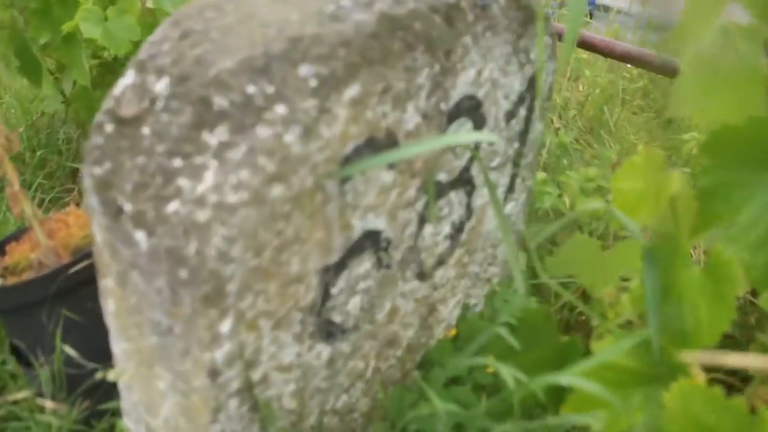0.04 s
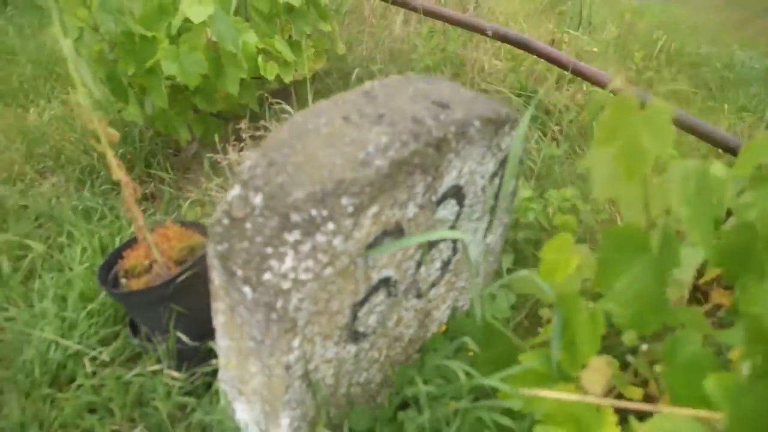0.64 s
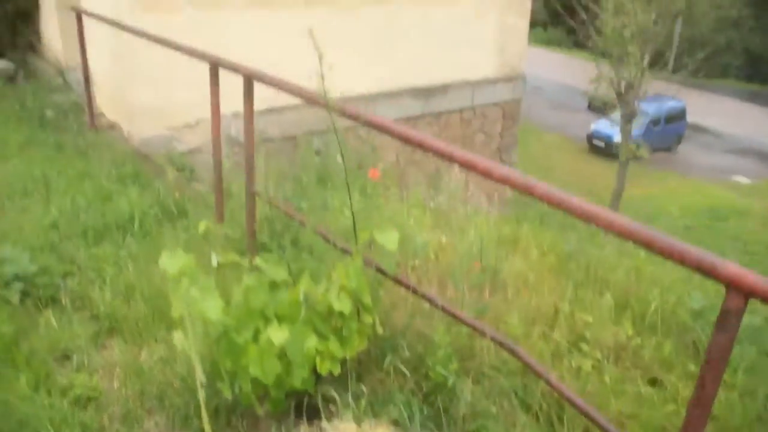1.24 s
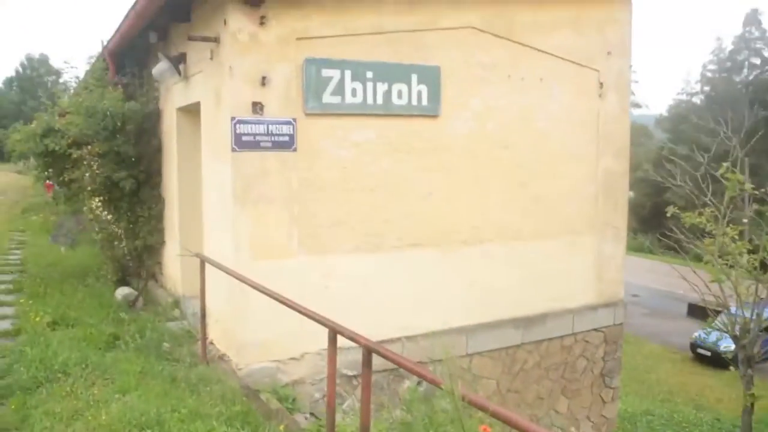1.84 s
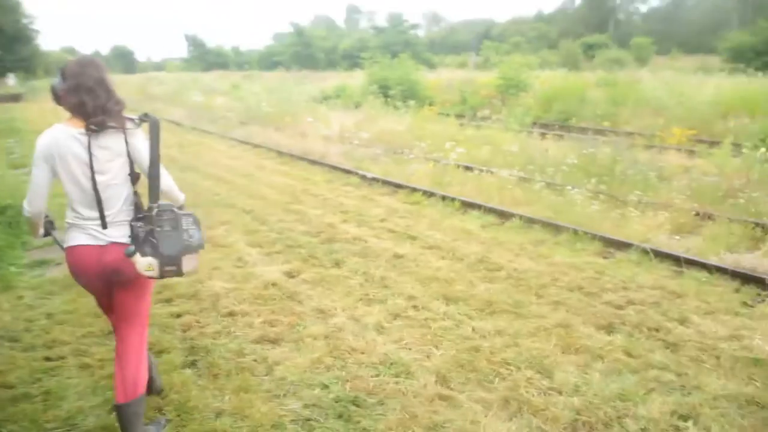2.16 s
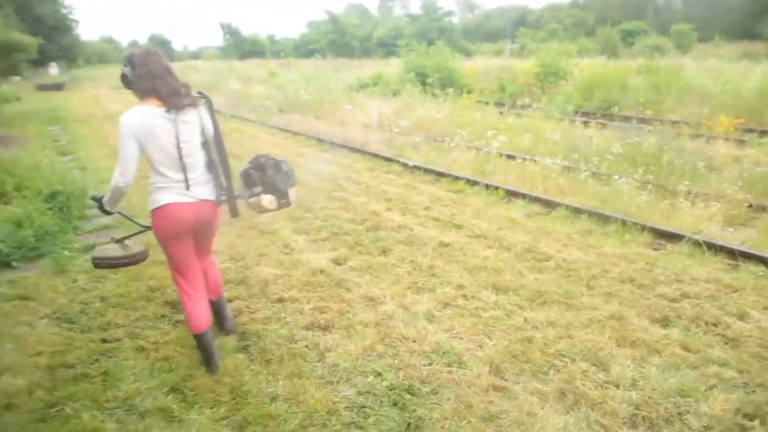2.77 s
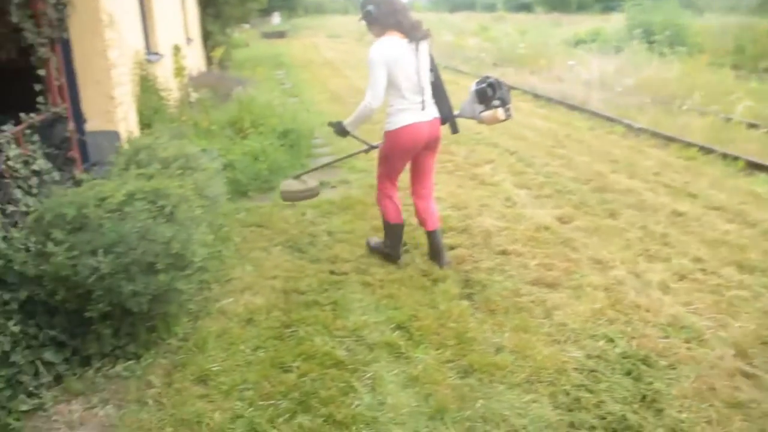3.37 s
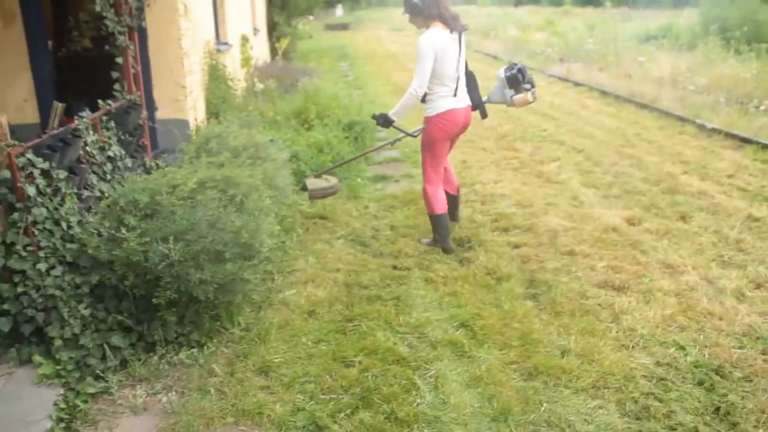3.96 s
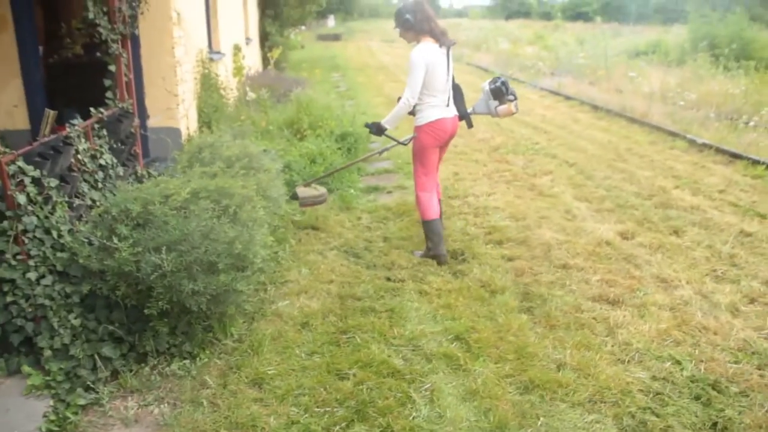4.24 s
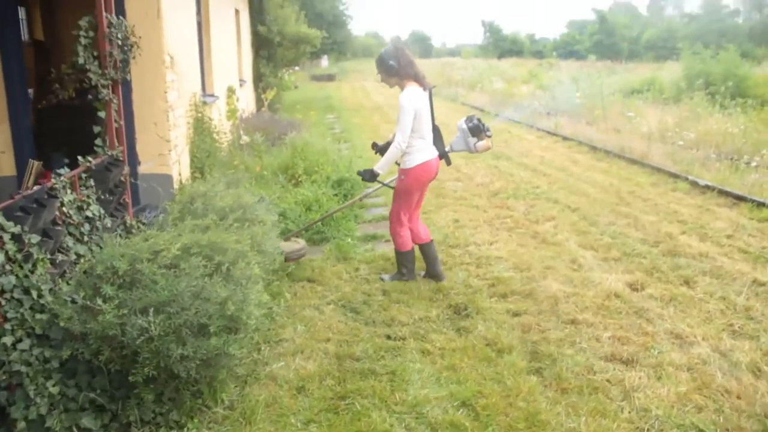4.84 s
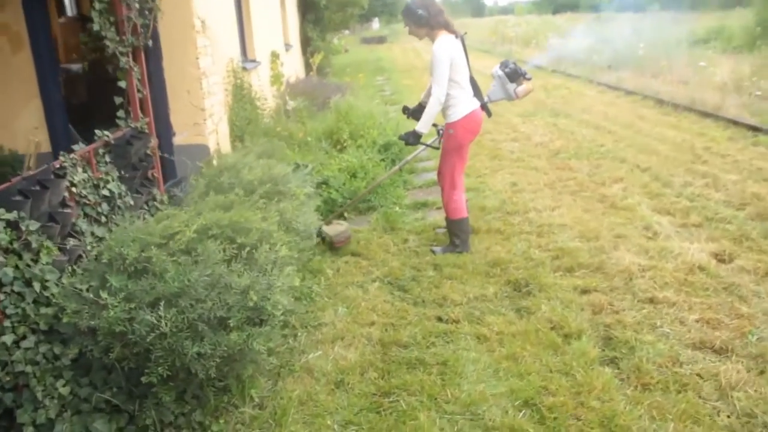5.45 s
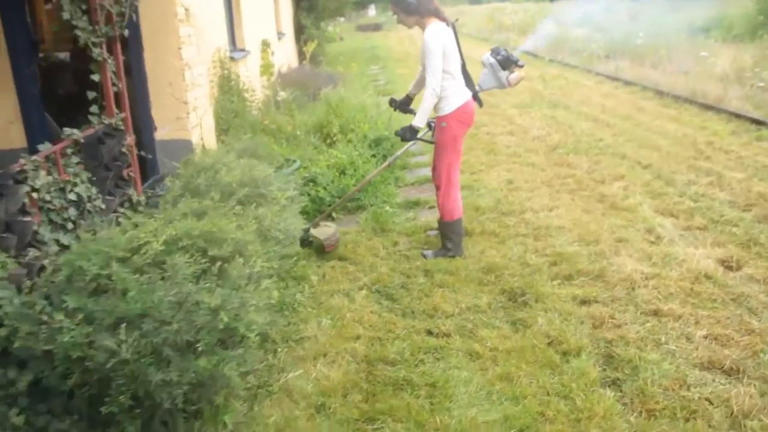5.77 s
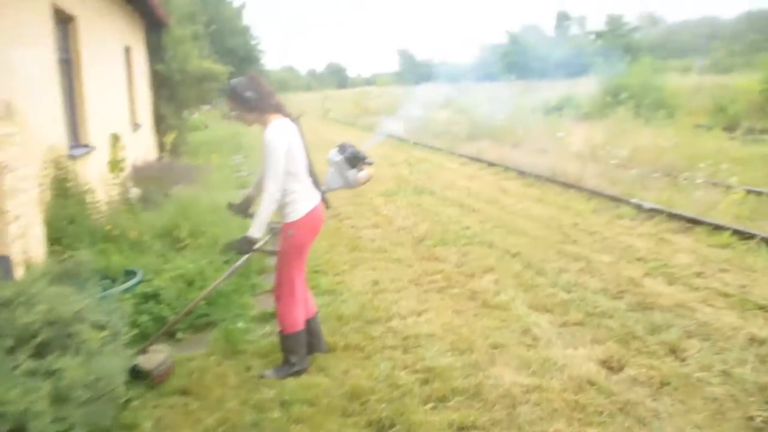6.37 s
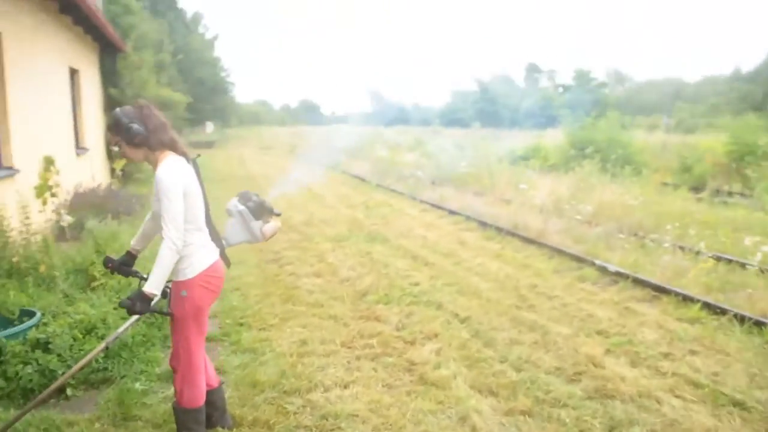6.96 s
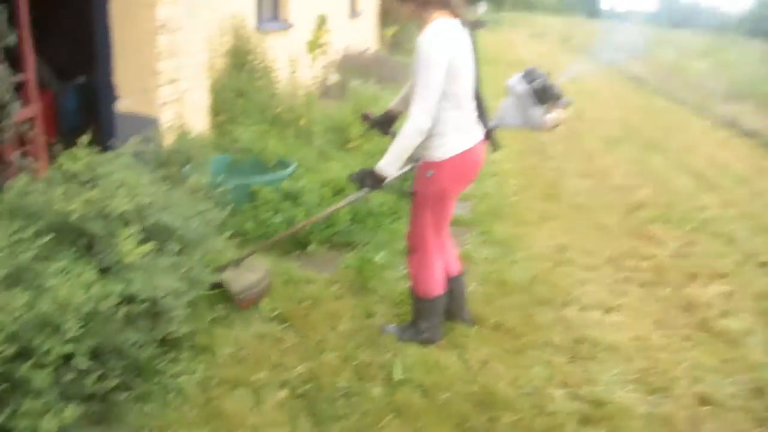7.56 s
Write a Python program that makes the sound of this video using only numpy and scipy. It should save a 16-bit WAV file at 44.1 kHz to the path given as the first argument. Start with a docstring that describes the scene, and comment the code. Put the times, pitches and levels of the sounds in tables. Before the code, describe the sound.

Faint two-stroke idling jumps to a near, uneven putter, then the trimmer's throttle opens and its line swishes through grass, snapping stalks.

```python
"""A soft, distant clatter comes first: a two-stroke string trimmer idling far down a garden.
Suddenly it is two metres from the microphone, knocking unevenly and rattling its loose clutch.
The throttle opens: sharp exhaust pulses speed up and echo from the ground and a house wall,
while the whirling line swishes through the grass and snaps stalks."""
import sys
import numpy as np
from scipy import signal
from scipy.fft import rfft, irfft, next_fast_len
from scipy.io import wavfile
from scipy.ndimage import uniform_filter1d, map_coordinates

SR = 44100
rng = np.random.default_rng(int(sys.argv[2]) if len(sys.argv) > 2 else 0)


def generate_wav(signal):
    """Clip the signal to [-1, 1] and save it as 16-bit WAV at the path in sys.argv[1]."""
    frames = np.transpose(np.atleast_2d(signal))
    scaled = np.clip(frames, -1, 1) * 32767
    pcm = np.round(scaled).astype(np.int16)
    wavfile.write(sys.argv[1], SR, pcm)


N = 339570
TIME = np.arange(N) / SR
CLOSE_S, THROTTLE_S = 2.1275, 4.62


def amp(db):
    """Decibels to gain."""
    return 10 ** (np.asarray(db) / 20)


def unit(x):
    """x at rms 1."""
    return x / np.sqrt(np.mean(x ** 2) + 1e-20)


def levelled(x):
    """x with its slow level held at rms 1."""
    return x / np.sqrt(np.abs(uniform_filter1d(x ** 2, size=6000)) + 1e-12)


def along(points, hz):
    """Rows of frequency and value, read on a log axis."""
    f, v = np.transpose(points)
    return np.interp(np.log(hz + 1), np.log(f + 1), v)


def curves(rows, at=TIME):
    """Each later column, interpolated along the first."""
    knots, *columns = np.transpose(rows)
    return [np.interp(at, knots, column) for column in columns]


def bell(x, centre, width):
    """A smooth hump of height 1."""
    return np.exp(-((x - centre) / width) ** 2)


def wobble(rate):
    """A smooth random curve, rate knots a second."""
    return map_coordinates(rng.standard_normal(int(N * rate / SR) + 4), [TIME * rate])


def noise():
    """White noise."""
    return rng.standard_normal(N)


def uneven(times, spread_db):
    """A random gain for each hit."""
    return amp(spread_db * rng.standard_normal(len(times)))


def pulses(times, sizes):
    """Impulses placed between samples."""
    at = np.asarray(times)[:, None] * SR
    taps = np.floor(at).astype(int) + np.arange(-7, 9)
    shape = np.sinc(taps - at) * np.cos(np.pi * (taps - at) / 16) ** 2
    weights = shape * np.asarray(sizes)[:, None]
    return np.bincount(np.clip(taps, 0, N).ravel(), weights.ravel(), N + 1)[:N]


def fading(times, sizes, t60):
    """An envelope that jumps at each time and dies away."""
    return signal.lfilter([1], [1, -amp(-60 / (t60 * SR))], pulses(times, sizes))


def grains(rate, spread_db):
    """Tiny impacts at random times, a few of them large."""
    chance, size = rng.random((2, N))
    return (chance < rate / SR) * amp(-spread_db * np.log(size + 0.024)) * noise()


def filtered(x, response):
    """x times a complex response of frequency."""
    size = 2 * next_fast_len(N // 2 + SR // 4)
    return irfft(rfft(x, size) * response(np.fft.rfftfreq(size, 1 / SR)), size)[:N]


def coloured(x, spectrum):
    """x through a causal filter with the given spectrum."""
    def response(hz):
        cepstrum = irfft(np.log(amp(along(spectrum, hz))))
        cepstrum[1:len(hz) - 1] *= 2
        cepstrum[len(hz):] = 0
        return np.exp(rfft(cepstrum))
    return filtered(x, response)


def rung(x, modes):
    """x through a set of resonances."""
    return filtered(x, lambda f: sum(amp(db) * 1j * f * width / (hz * hz - f * f + 1j * f * width)
                                     for hz, width, db in modes))


def gliding(x, hz, width_hz):
    """x through one resonance whose centre moves."""
    carrier = np.exp(2j * np.pi * np.cumsum(hz) / SR)
    pole = np.exp(-np.pi * width_hz / SR)
    return 2 * np.real(carrier * signal.lfilter([1 - pole], [1, -pole], x * carrier.conj()))


def shell(x, t60):
    """The many close modes of thin metal covers give a fixed, fine colour."""
    t = np.arange(SR // 8) / SR
    ring = rng.standard_normal(len(t)) * amp(-60 * t / t60)
    return signal.oaconvolve(x, ring / np.linalg.norm(ring))[:N]


# Crank with the throttle open: time_s, speed_hz
REVS = [(4.62, 41.9), (4.7, 44.7), (4.82, 58.1), (4.9, 67.7), (5.05, 75.2), (5.16, 75.6), (5.4, 79.4),
        (5.7, 81.6), (5.9, 81.5), (6.1, 83), (6.42, 83.3), (6.62, 85.2), (6.8, 82.5), (7.0, 85.3),
        (7.22, 88.9), (7.4, 90.9), (7.7, 89.3)]
def crank(far_hz=47.57, close_hz=42.53):
    """Crank speed, turns so far and when each ends; whole turns fit between the close knocks."""
    knock_s = np.transpose(KNOCKS)[0]
    gaps = np.diff(knock_s)
    close = (np.round(gaps * close_hz) / gaps)[np.searchsorted(knock_s[1:-1], TIME)]
    revving = curves(REVS)[0] * (1 + 0.0018 * wobble(30))
    far = far_hz * (1 + 0.01988 * wobble(18))
    speed = np.select([TIME < CLOSE_S, TIME < THROTTLE_S], [far, close], revving)
    turns = np.cumsum(speed) / SR
    return speed, turns, np.interp(np.arange(1, int(turns[-1])), turns, TIME)


# Engine casing and shaft: pitch_hz, width_hz, gain_db
CASING_MODES = [(1147, 280, 2), (1474, 42, 0), (1610, 81, 1), (1791, 43, 5), (2004, 17, 4.5), (2434, 39, 0),
                (2940, 16.5, 7), (3690, 60, -16), (4560, 83, -8), (5000, 230, -7.5), (6260, 190, 1),
                (7800, 250, 0), (9300, 280, 3)]
def clatter(turns, spectrum, throb_db, ring):
    """Piston and gears shake the casing, hardest once a turn."""
    shake = noise() * amp(throb_db * np.cos(2 * np.pi * turns) + 1.07 * wobble(70))
    covers = 0.4 * shell(shake, t60=0.04)
    return unit(coloured(shake + ring * rung(shake, CASING_MODES) + covers, spectrum))


# Clutch shoes and drum: pitch_hz, width_hz, gain_db
CLUTCH_MODES = [(1998, 46, -5), (2870, 25, 3), (3430, 200, -4), (4080, 60, -2), (5000, 250, -6.5),
                (6040, 130, 0), (6390, 190, -1), (7760, 220, -4), (8280, 140, -7), (8930, 130, -9),
                (9700, 160, -0.5), (10330, 260, -1.5), (11500, 160, 0), (11860, 100, -1)]
# Bright colour of steel: frequency_hz, gain_db
STEEL = [(300, -24), (1800, -5), (3200, 7), (4500, -0.5), (6300, 3.5), (7500, 2.5), (10400, 3), (11000, 1),
         (12500, -0.5), (15500, -15)]
def jingle(drive):
    """Small steel parts ring the clutch and its covers."""
    return coloured(0.55 * drive + rung(drive, CLUTCH_MODES) + 0.32 * shell(drive, t60=0.0065), STEEL)


# Idle from down the garden: time_s, drone_db, murmur_db, clatter_db, cover_db, chime_db, putt_db
FAR_LEVELS = [(0, -66, -84, -63.5, -69.5, -78, -75.5), (0.7, -65.5, -74, -63.5, -72, -88, -83),
              (1.05, -66, -68.5, -67.5, -74, -84, -89), (1.38, -65, -67.5, -65.5, -78, -87, -81),
              (1.52, -66, -68, -70.5, -76, -77.5, -88), (2.1, -65.5, -67.5, -71, -70, -75, -86)]
# Colours of the idling engine: frequency_hz, gain_db
IDLE_DRONE = [(50, -22), (110, -17), (175, -9), (260, -3.5), (340, -6), (480, -4), (800, -7.5), (1500, -18),
              (4000, -40)]
FAR_DRONE = [(20, -16), (60, -9), (100, -26.5), (190, -5.5), (330, -9.5), (500, -12), (800, -0.5),
             (1000, 0.5), (1600, -3), (2500, -12), (4000, -10.5), (6000, -47)]
FAR_MURMUR = [(100, -15), (330, -14), (480, -5), (650, -2), (900, -9), (1500, -9), (4000, -47)]
FAR_CLATTER = [(100, -11), (600, -6), (1200, -20), (1750, -1.5), (2500, 1.5), (3240, -8), (4900, -21),
               (5600, -16.5), (15000, -37)]
# Cover ring and a high chime: pitch_hz, width_hz, gain_db
COVER_MODES = [(1777, 27, 0), (2900, 27, -5.5)]
CHIME_MODES = [(4150, 37, 7), (4880, 380, 3), (6140, 90, -2), (6440, 38, -3), (6900, 190, 1),
               (8350, 130, -4)]
def far_idle(turns, strokes, turns_per_kick=5):
    """Far from the microphone the idle is a clatter, with a soft putt and faint ticks at each firing."""
    drone_db, murmur_db, clatter_db, cover_db, chime_db, putt_db = curves(FAR_LEVELS)
    kicks = strokes[turns_per_kick - 1::turns_per_kick]
    shake = noise() * (0.35 + fading(kicks, 0.5 * rng.random(len(kicks)) + 0.5, t60=0.04))
    shake *= amp(2 * wobble(70))
    ticks = amp(-80) * unit(jingle(shake))
    cover = amp(cover_db) * unit(rung(shake, COVER_MODES))
    chime = amp(chime_db) * unit(rung(shake, CHIME_MODES))
    puffs = coloured(pulses(kicks, np.ones(len(kicks))), IDLE_DRONE)
    putts = amp(putt_db) * unit(rung(puffs, [(224, 120, 0)]))
    drone = amp(drone_db) * unit(coloured(noise(), FAR_DRONE))
    murmur = amp(murmur_db) * unit(coloured(noise(), FAR_MURMUR))
    body = amp(clatter_db) * clatter(turns, FAR_CLATTER, throb_db=1.5, ring=0.78)
    return drone + murmur + body + putts + ticks + cover + chime


# Open air at the microphone: frequency_hz, gain_db
AIR_RUMBLE = [(20, 6), (60, 0), (150, -10), (600, -30), (4000, -38)]
def garden_air():
    """Outdoor air rumbles faintly under everything."""
    return amp(-84) * unit(coloured(noise(), AIR_RUMBLE))


# From engine to microphone: time_s, distance_m
MIC_DISTANCE = [(2.13, 2.05), (2.5, 2.26), (2.95, 2.39), (3.2, 2.97), (3.65, 2.9), (4.0, 3.53), (4.6, 3.82),
                (5.2, 3.66), (5.85, 3.33), (6.5, 2.97), (7.3, 2.53), (7.7, 2.36)]
def nearness(reference_m=3):
    """Sound pressure falls with distance."""
    return reference_m / curves(MIC_DISTANCE)[0]


# Echoes at the microphone: time_s, ground_gain, wall_gain
ECHO_GAINS = [(4.8, 0.13, 0.054), (5.5, 0.27, 0.026), (6.0, 0.25, 0.21), (6.6, 0.14, 0.12),
              (7.7, 0.09, 0.094)]
def echoed(x, engine_height_m=1.0, mic_height_m=1.6, wall_delays_s=(0.00347, 0.004)):
    """The ground answers later as the trimmer comes closer; the house walls after fixed delays."""
    metres, = curves(MIC_DISTANCE)
    ground, walls = curves(ECHO_GAINS)
    direct_m = np.hypot(metres, mic_height_m - engine_height_m)
    detour_m = np.hypot(metres, mic_height_m + engine_height_m) - direct_m
    late = lambda s: np.interp(TIME - s, TIME, x)
    return x + ground * late(detour_m / 343) + walls * sum(late(s) for s in wall_delays_s)


# Decay of the garden: frequency_hz, t60_s
GARDEN_DECAY = [(200, 0.2), (1500, 0.081), (5000, 0.042), (14000, 0.013)]
def garden_scatter(x, positions=20):
    """Scatter from walls and bushes, changing as the trimmer and the microphone move."""
    out = np.zeros(N)
    for k in range(positions):
        hz, t, bands = signal.stft(rng.standard_normal(SR // 5), SR, nperseg=256)
        decay = amp(-60 * t / along(GARDEN_DECAY, hz)[:, None])
        tail = signal.istft(bands * decay, SR, nperseg=256)[1]
        tail = np.pad(tail / np.linalg.norm(tail), (SR // 300, 0))
        share = np.sqrt(np.clip(1 - np.abs(TIME / TIME[-1] * (positions - 1) - k), 0, 1))
        out += signal.oaconvolve(x * share, tail)[:N]
    return out


# Cooling fins: pitch_hz, width_hz, gain_db
FIN_MODES = [(1505, 52, -1), (1594, 29, -1), (1785, 30, -2), (1998, 58, 2), (2365, 21, -0.5), (2724, 20, 2),
             (2930, 19, 0.5), (3340, 91, -11)]
def fins(strokes):
    """The piston slaps the cylinder on every turn and small rattles join in; the fins ring on."""
    slaps = unit(pulses(strokes, uneven(strokes, 3.5)))
    rattles = unit(grains(rate=300, spread_db=2.5))
    return amp(-57.5) * nearness() ** 2.3 * unit(rung(slaps + rattles, FIN_MODES))


# Casing, piston slap and one exhaust putt from close by: frequency_hz, gain_db
CLOSE_CLATTER = [(60, -71), (250, -34), (500, 3.5), (800, -2.5), (1200, -2.5), (1900, -1), (3000, -4.5),
                 (4300, -8.5), (7000, -17.5), (15000, -28)]
PISTON_SLAP = [(700, -33), (1500, 1.5), (2600, 2.5), (3500, -3), (5000, -5), (12000, -29)]
PUTT = [(80, -26), (180, -15.5), (280, -6), (380, -2), (500, -3), (700, -13), (1500, -16), (4000, -43)]
AIRBOX_HZ = 161.1
def close_idle(turns, strokes):
    """Two to four metres off, the engine drones, clatters and knocks, and its clutch rattles."""
    pops = knocks()
    drone = amp(-61.5) * unit(coloured(noise() * amp(0.49 * np.cos(2 * np.pi * turns)), IDLE_DRONE))
    body = amp(-50.5) * clatter(turns, CLOSE_CLATTER, throb_db=1.0, ring=0.94)
    # the bright slap of the piston carries only a short way
    slap = amp(-63) * nearness() ** 4.45 * clatter(turns, PISTON_SLAP, throb_db=4.5, ring=0.93)
    # turns that do not fire still puff through the muffler
    puffs = amp(-61) * unit(rung(coloured(pulses(strokes, uneven(strokes, 2)), PUTT), IDLE_MUFFLER))
    airbox = amp(-72) * unit(rung(coloured(noise(), IDLE_DRONE), [(AIRBOX_HZ, 18, 0)]))
    engine = echoed(nearness() * (drone + body)) + airbox + slap + fins(strokes) + puffs
    return engine + pops + amp(-11.5) * garden_scatter(pops) + clutch(strokes)


# Clutch clashes between firings: start_s, level_db
CLASHES = [(2.14, -36.5), (2.1653, -31.5), (2.1912, -34), (2.2124, -30), (2.2354, -31), (2.33, -33),
           (2.3545, -35), (2.4394, -45), (2.4653, -41), (2.4736, -37), (2.5436, -33), (2.5905, -45),
           (2.6614, -44), (2.6853, -38), (2.7994, -44), (2.8444, -44), (2.8668, -37), (2.889, -35),
           (2.9118, -43), (2.957, -33.5), (2.9781, -36), (3.0001, -38), (3.023, -39), (3.0749, -43),
           (3.3218, -46), (3.4386, -41)]
# Chatter of the loose clutch: time_s, level_db
CHATTER = [(2.13, -48.5), (3.03, -45), (3.17, -50.5), (4.6, -52)]
def clutch(strokes, lag_s=0.0033, rebound_s=0.036):
    """Loose parts clash after each knock, rebound once and chatter on every turn."""
    kicks, _, _, kick_db = np.transpose(KNOCKS)
    hits = lambda times, db: fading(times, amp(db) * uneven(times, 4), t60=0.071)
    chatter = hits(kicks + lag_s + rebound_s, db=-11) + hits(strokes, db=-15)
    chatter += amp(-20.5 + 5 * wobble(90))  # unbroken sizzle
    start_s, db = np.transpose(list(zip(kicks + lag_s, kick_db)) + CLASHES)
    clashes = fading(start_s, amp(db - 9), t60=0.0058) + fading(start_s, amp(db - 10.5), t60=0.062)
    contacts = unit(noise() + 0.5 * unit(grains(rate=4000, spread_db=3)))
    return jingle((amp(curves(CHATTER)[0]) * chatter + clashes) * contacts)


# Idle firings near the microphone: start_s, level_db, thump_offset_db, clutch_db
KNOCKS = [(2.196, -34.5, 12.5, -28.5), (2.288, -37, 12, -32), (2.388, -40, 14, -33.5), (2.505, -40, 7, -31),
          (2.623, -40.5, 10, -34), (2.718, -41.5, 7, -31), (2.832, -40.5, 7, -33), (2.941, -41, 4, -36),
          (3.053, -43, 11.5, -36), (3.169, -44.5, 4, -39), (3.284, -41.5, 10, -44), (3.403, -41, 2, -41),
          (3.517, -40.5, 2, -39), (3.625, -40.5, -1, -38), (3.736, -41.5, -5, -38.5),
          (3.852, -41.5, -8, -40), (3.967, -46, -6, -44), (4.086, -45.5, -9, -41), (4.207, -42.5, -11, -43),
          (4.318, -39.5, -6, -41), (4.437, -45, -10, -46), (4.535, -45.5, -6, -42)]
# Muffler at idle: pitch_hz, width_hz, gain_db
IDLE_MUFFLER = [(292, 60, -5.5), (445, 102, -1), (555, 120, -9.5)]
def knocks(bark_db=44, thump_db=33):
    """Only every fourth or fifth turn fires; turbulent gas makes each pop a little different."""
    start_s, db, offset_db, _ = np.transpose(KNOCKS)
    gas = 0.008 * fading(start_s + 0.003, amp(db), t60=0.025) * noise()
    kicks = coloured(pulses(start_s + 0.00312, -amp(db)) + gas, PUTT)
    shoves = coloured(pulses(start_s + 0.0034, -amp(db + offset_db)), PUTT)
    thumps = rung(shoves, [(237, 92, 1), (690, 91, -2)])
    return amp(bark_db) * rung(kicks, IDLE_MUFFLER) + amp(thump_db) * thumps


# Rhythm of full burns: start_s, turns_per_burn
BURN_CYCLES = [(0, 1), (4.95, 3), (5.4, 2), (5.65, 4), (6.38, 3), (6.77, 4), (6.87, 3)]
def turns_since_burn(strokes):
    """Running rich, the engine burns fully only every few turns; 0 marks a full burn."""
    starts, cycles = np.transpose(BURN_CYCLES)
    return np.arange(len(strokes)) % cycles[np.searchsorted(starts, strokes) - 1]


# Firing, steadier towards full speed: time_s, jitter_s, hurry_per_turn_s, turbulence_gain
RAGGEDNESS = [(4.62, 0.0002, 0.00012, 0.35), (4.9, 0.0002, 0.00012, 0.3), (5.1, 0.00012, 0.00015, 0.08),
              (6.1, 0.00013, 0.00019, 0.07), (6.6, 0.00005, 0.00017, 0.04), (7.3, 0.00004, 0.0001, 0.03)]
# One pulse at the exhaust port: frequency_hz, gain_db
PORT_PULSE = [(40, -97), (92, -34), (125, -14), (200, -21.5), (330, -10.5), (600, -1.5), (950, -0.5),
              (1300, -1.5), (1700, 1.5), (2200, -22), (3000, -13.5), (5000, -26), (12000, -64)]
# Muffler as the throttle opens, then under load: pitch_hz, width_hz, gain_db
OPENING_MUFFLER = [(203, 62.3, 5.5), (437.8, 130, 3.5), (484, 50, 1), (560, 52, -5)]
HOT_MUFFLER = [(183.13, 71, -6), (282, 35, -4), (403.9, 36, 0.5), (449, 34, 6), (535, 120, -19)]
# Upper modes shift as the gas heats and the engine swings round; a curve each: time_s, pitch_hz, gain_db
EXHAUST_GLIDES = [
    [(5.2, 570, -12), (5.9, 620, -2), (6.4, 602, 5), (6.9, 642, 8), (7.5, 606, 4.5)],
    [(5.2, 970, 8), (5.75, 890, 3), (6.15, 876, 4), (6.55, 880, -3), (7.5, 938, 5)],
    [(5.1, 1240, 5), (5.7, 1150, 2), (6.1, 1200, 4.5), (6.55, 1080, 2), (7.0, 1090, -3), (7.6, 1080, -11)],
    [(5.1, 1720, 4), (5.55, 1710, -10), (5.85, 1600, -9), (6.3, 1650, 2), (7.5, 1610, -5)],
]
def exhaust(strokes, since_burn, port_db, muffler_db):
    """Each turn sends a pulse out of the port; a full burn barks harder and hurries the next turns."""
    burns = since_burn == 0
    timing, port_spread, blast_spread = rng.standard_normal((len(strokes), 3)).T
    jitter_s, hurry_s, turbulence = curves(RAGGEDNESS, at=strokes)
    times = strokes + jitter_s * timing - hurry_s * since_burn
    port = levelled(coloured(pulses(times, (1 + 0.12 * burns) * amp(0.8 * port_spread)), PORT_PULSE))
    sizes = (1 + 0.3 * burns) * amp(0.9 * blast_spread)
    gas = fading(times, turbulence * sizes, t60=0.01) * noise()
    blasts = coloured(pulses(times, sizes) + gas, PORT_PULSE)
    heat = np.clip((TIME - 4.9) / 0.4, 0, 1)
    upper = sum(amp(db) * gliding(blasts, hz, width_hz=81) for hz, db in map(curves, EXHAUST_GLIDES))
    hot = rung(blasts, HOT_MUFFLER) + upper
    bark = levelled((1 - heat) * rung(blasts, OPENING_MUFFLER) + heat * hot)
    direct = amp(port_db) * port + amp(muffler_db) * bark
    # the nearer the microphone, the less the garden blurs the pulses
    return direct + amp(-11) * garden_scatter(direct) / nearness() ** 2


def engine_tones(speed, turns):
    """The air box hums at twice the crank speed and the muffler at five times, under a thin whistle."""
    phase = 2 * np.pi * turns
    in_tune = bell(2 * speed, AIRBOX_HZ, width=4.4)
    resonance = 0.02 * (2 * speed / AIRBOX_HZ) ** 4 + in_tune
    hum = resonance * amp(-57 + 1.8 * wobble(30)) * np.sin(2 * phase + 0.35 * wobble(34))
    drone = amp(-48) * bell(5 * speed, 401, width=24) * np.sin(5 * phase + 0.28 * wobble(25))
    # the intake gulps as the throttle opens
    gulp = amp(-68) * bell(TIME, 4.84, width=0.14) * np.sin(2 * phase)
    whistle = amp(-66 + 5.47 * in_tune) * unit(rung(noise(), [(7290, 60, 0)]))
    return hum + drone + gulp + whistle


# Grass meeting the line: time_s, level_db
CUTTING = [(4.62, -49.5), (5.0, -52.5), (5.4, -54), (5.9, -50.5), (6.3, -46.5), (6.7, -48.5), (7.1, -47),
           (7.7, -48)]
# Thicker tufts: centre_s, half_length_s, boost_db
TUFTS = [(5.056, 0.02, 10), (6.318, 0.12, 0), (7.125, 0.055, 3), (7.57, 0.11, 6)]
# Tearing grass: frequency_hz, gain_db
SWISH = [(100, -50), (500, -25), (3000, -8), (6000, -10), (8000, -9), (10300, -7), (12500, -12.5),
         (15500, -24)]
def grass(turns):
    """The whirling line shreds blades in a hiss of tiny impacts that swells once a turn."""
    tuft_db = sum(db * bell(TIME, centre, width) for centre, width, db in TUFTS)
    shreds = noise() + 1.02 * unit(grains(rate=500, spread_db=6.5))
    shreds *= amp(2.7 * np.cos(2 * np.pi * turns) + 0.65 * wobble(35))
    ringing = 0.18 * rung(shreds, CASING_MODES) + 0.83 * shell(shreds, t60=0.027)
    return amp(curves(CUTTING)[0] + tuft_db) * unit(coloured(shreds + ringing, SWISH))


# Open throttle at three metres: speed_hz, port_db, muffler_db, clatter_db, buzz_db
LOAD_LEVELS = [(43, -50, -41.5, -52, -61), (58, -49.5, -41, -43, -46), (80.24, -43.5, -50, -41, -49.5),
               (79.7, -47.5, -47, -42.5, -46), (82.85, -44, -42.5, -38.5, -49.5),
               (88.8, -40, -42, -39.5, -41)]
# Casing and covers under load: frequency_hz, gain_db
LOAD_CLATTER = [(100, -26.5), (250, -3), (400, 4), (600, 8), (900, 4), (1600, 1), (2800, 2), (4200, -8),
                (6000, -12), (15000, -28)]
COVER_BUZZ = [(100, -31), (300, -15), (550, -7.5), (1000, -4.5), (1700, 3), (2200, -8), (4000, -13),
              (9000, -41)]
def open_throttle(speed, turns, strokes):
    """The engine revs and cuts a few metres off; each full burn shakes its covers in the same way."""
    port_db, muffler_db, clatter_db, buzz_db = curves(LOAD_LEVELS, at=speed)
    since_burn = turns_since_burn(strokes)
    tones = engine_tones(speed, turns)
    body = amp(clatter_db) * clatter(turns, LOAD_CLATTER, throb_db=-0.5, ring=1.0)
    covers = shell(pulses(strokes + 0.003, since_burn == 0), t60=0.2)
    buzz = amp(buzz_db) * levelled(coloured(covers, COVER_BUZZ))
    swish = grass(turns)
    engine = exhaust(strokes, since_burn, port_db, muffler_db) + body + buzz
    return nearness() * (echoed(engine) + growl(speed, strokes, since_burn) + tones + swish)


# Pings while the line cuts: start_s, level_db
PINGS = [(6.1971, -49), (6.462, -46), (6.5333, -55), (7.2722, -54), (7.3694, -52), (7.4722, -49),
         (7.5246, -37), (7.5825, -49), (7.6254, -46)]
def pings(pitch_hz=15540):
    """Thin, short rings at the very top."""
    start_s, db = np.transpose(PINGS)
    tone = np.sin(2 * np.pi * pitch_hz * TIME + 0.9 * wobble(120))
    return fading(start_s, amp(db - 3), t60=0.12) * tone


# The line hits stalks: start_s, level_db, woody_offset_db, sharp_offset_db
STALK_HITS = [(6.2192, -24.5, -3, -6), (6.274, -16, -17, -16), (6.2842, -17, -7, -17),
              (6.3225, -18, -9.5, -16), (6.3692, -24.5, -3, -9), (6.4158, -20, -23, -10),
              (6.4616, -23, -6, -12), (7.112, -20, -4.5, -14), (7.1818, -18, -16, -13),
              (7.1895, -10.5, -6, -15), (7.273, -15.5, -18, -10), (7.283, -18, -6.5, -19),
              (7.4403, -12.5, -28, -22), (7.473, -23, 0, -6), (7.516, -19, -8, -17), (7.5254, -9, -12, -14),
              (7.625, -24, -4, -19)]
# Ring of a struck stalk: pitch_hz, width_hz, gain_db
WOODY_MODES = [(2510, 134, -0.5), (2795, 215, -2.5)]
SHARP_MODES = [(6040, 530, -6.5), (8100, 320, -11), (10330, 710, -17)]
def snaps(ring_db=44, hardness=1.33):
    """Thick stalks crack under the line; the harder the hit, the more they ring, woody or sharp."""
    start_s, db, woody_db, sharp_db = np.transpose(STALK_HITS)
    crack = coloured(fading(start_s + 0.000365, amp(db - 1), t60=0.0093) * noise(), SWISH)
    def blow(offset_db):
        return coloured(pulses(start_s + 0.000802, amp(hardness * db + offset_db + ring_db)), SWISH)
    direct = crack + rung(blow(woody_db), WOODY_MODES) + rung(blow(sharp_db), SHARP_MODES)
    return direct + amp(-11) * garden_scatter(direct)


def growl(speed, strokes, since_burn, from_hz=87.5):
    """Near top speed every full burn adds a low thud, and the thuds merge into a buzz."""
    spectrum = ((105, -48), (150, -6), (220, 0), (300, 0), (450, 2), (900, -23))  # frequency_hz, gain_db
    sizes = (since_burn == 0) * uneven(strokes, 0.6)
    thuds = levelled(coloured(pulses(strokes, sizes), spectrum))
    return amp(-51.5) * np.clip((speed - from_hz) / 3, 0, 1) * thuds


def scene():
    """Far idle, close idle, then open throttle, over a low rumble of outdoor air."""
    speed, turns, strokes = crank()
    throttle = np.clip((TIME - THROTTLE_S) / 0.13, 0, 1)
    idle = np.where(TIME >= CLOSE_S, close_idle(turns, strokes), far_idle(turns, strokes))
    air = garden_air()
    trimmer = np.sqrt(1 - throttle) * idle + np.sqrt(throttle) * open_throttle(speed, turns, strokes)
    return (trimmer + snaps() + pings() + air)[None]


def record(dry, top_hz=15900):
    """One microphone at ear height, with nothing kept above the band limit."""
    return filtered(dry[0], lambda hz: hz < top_hz)[None]


dry = scene()
out = record(dry)
generate_wav(out)
```